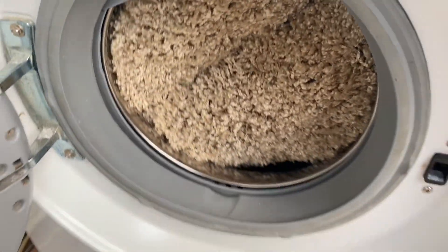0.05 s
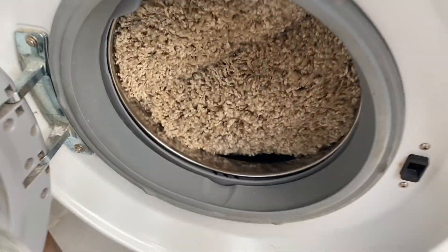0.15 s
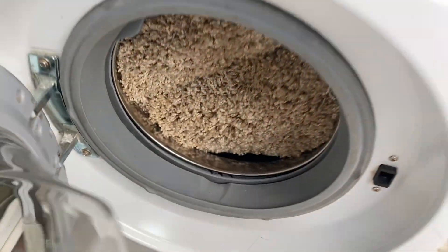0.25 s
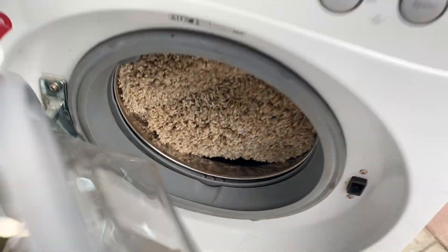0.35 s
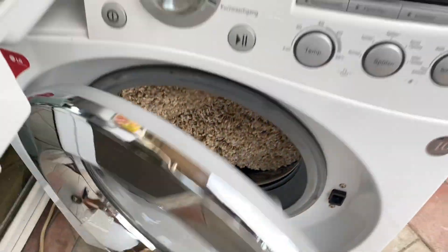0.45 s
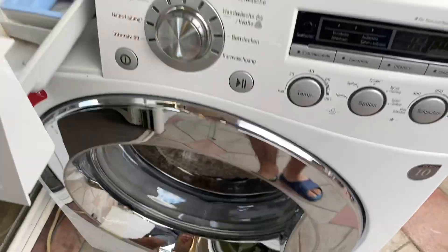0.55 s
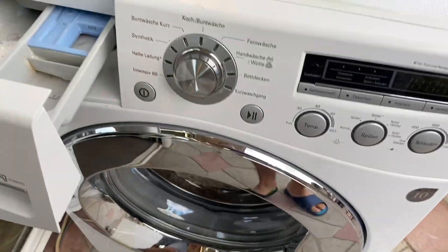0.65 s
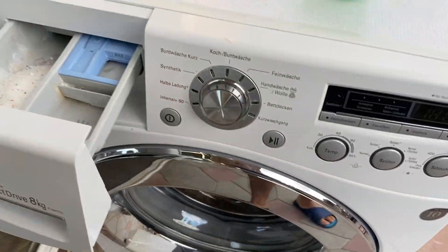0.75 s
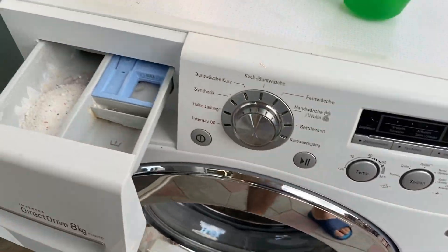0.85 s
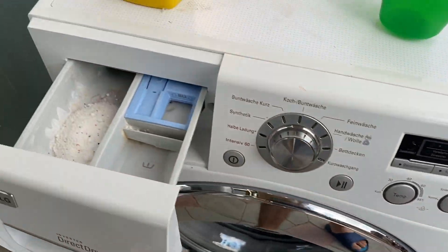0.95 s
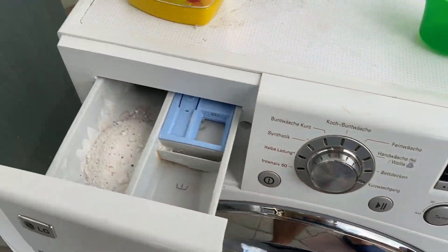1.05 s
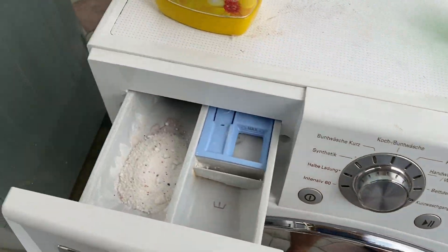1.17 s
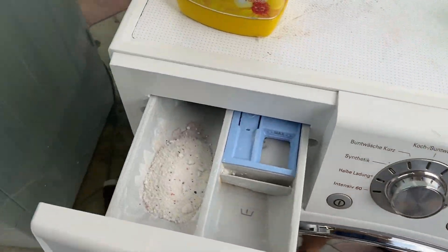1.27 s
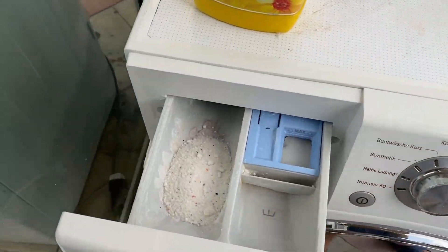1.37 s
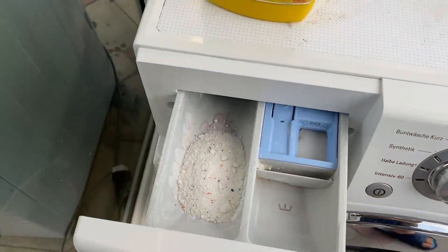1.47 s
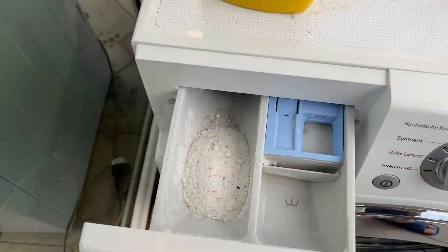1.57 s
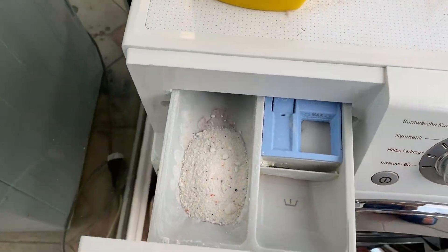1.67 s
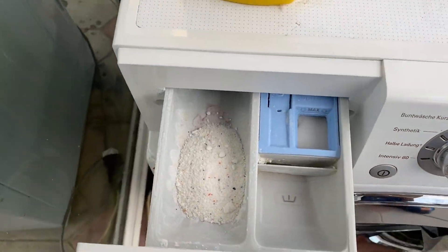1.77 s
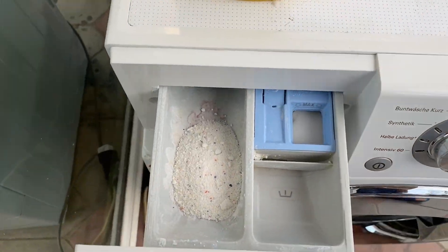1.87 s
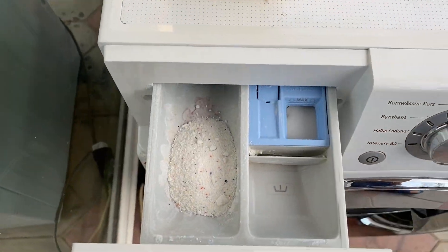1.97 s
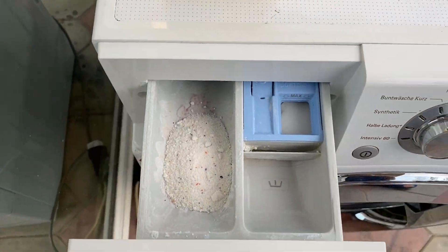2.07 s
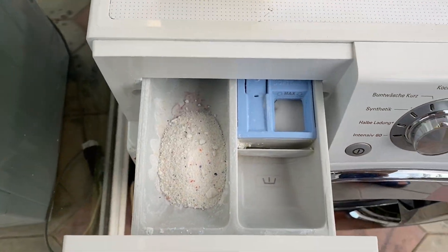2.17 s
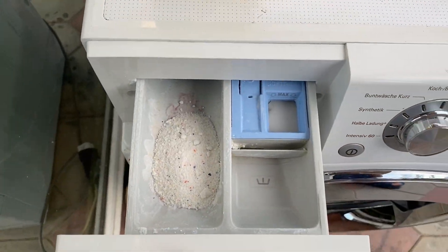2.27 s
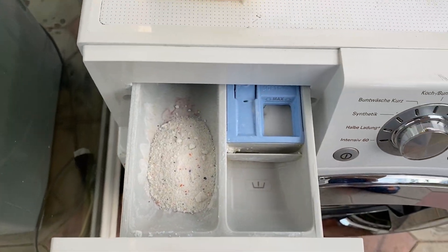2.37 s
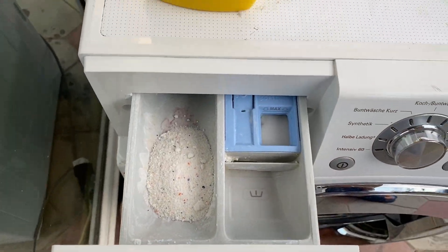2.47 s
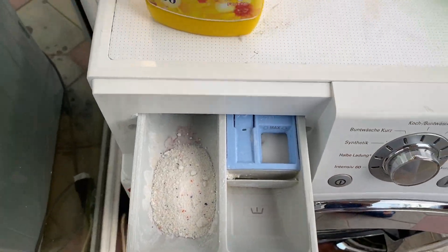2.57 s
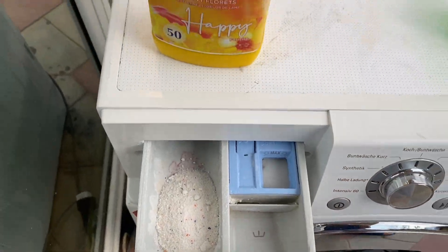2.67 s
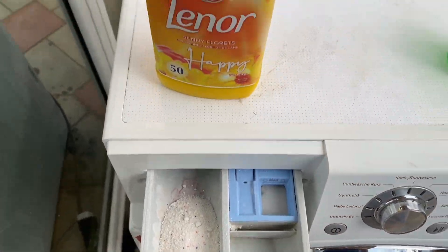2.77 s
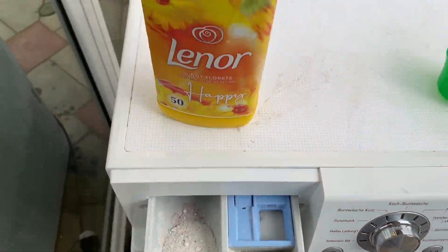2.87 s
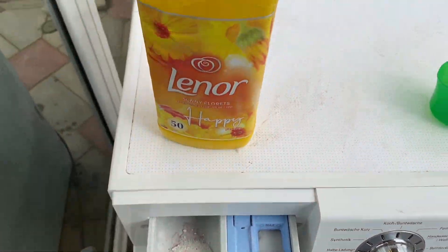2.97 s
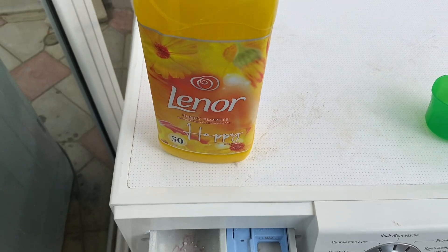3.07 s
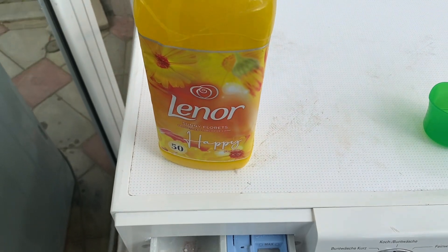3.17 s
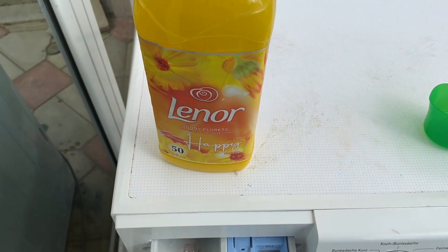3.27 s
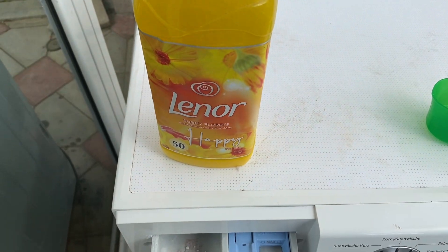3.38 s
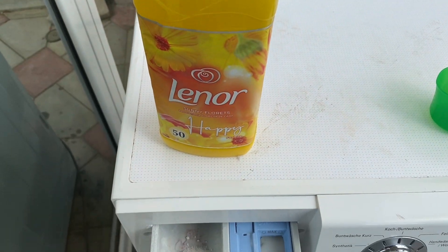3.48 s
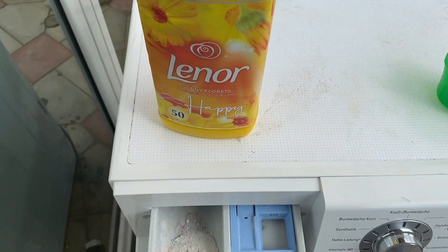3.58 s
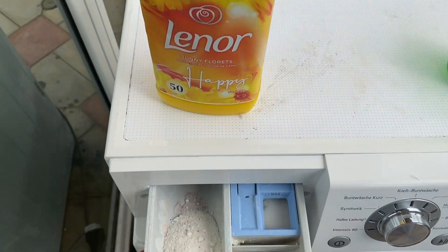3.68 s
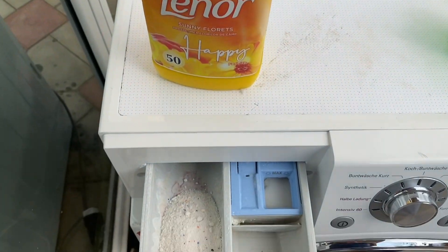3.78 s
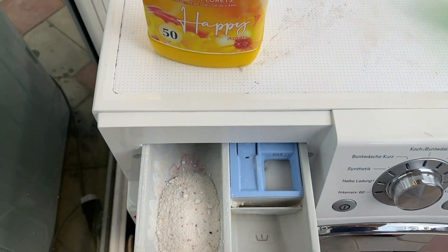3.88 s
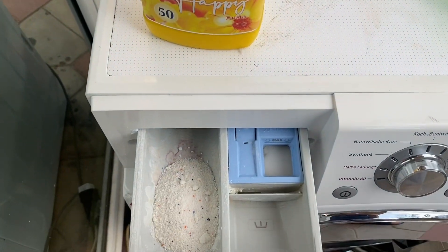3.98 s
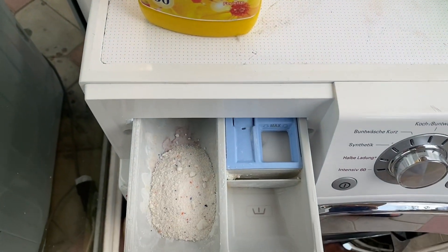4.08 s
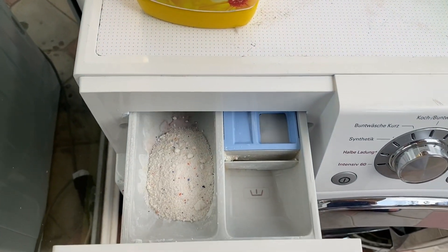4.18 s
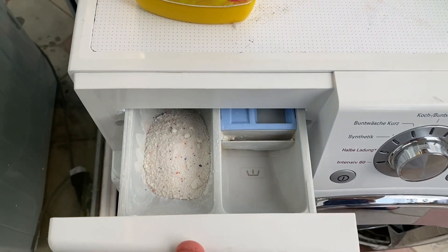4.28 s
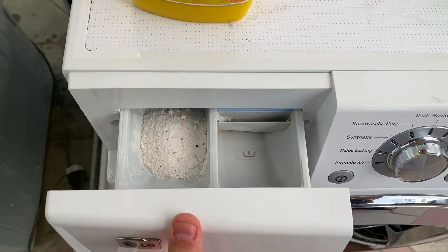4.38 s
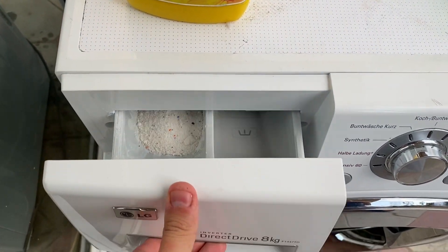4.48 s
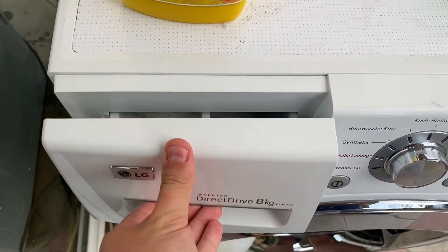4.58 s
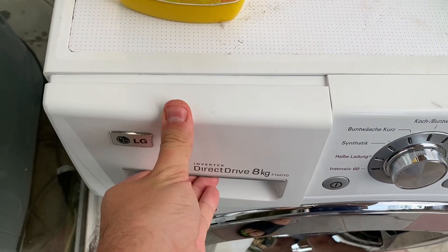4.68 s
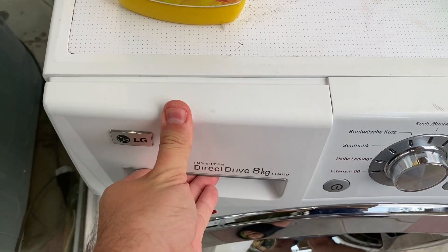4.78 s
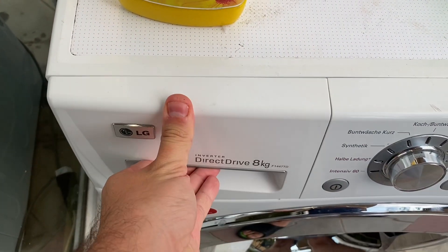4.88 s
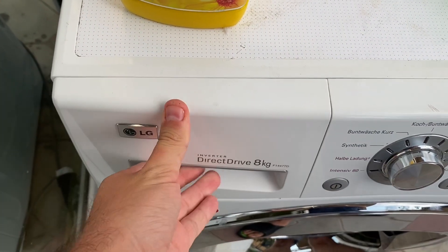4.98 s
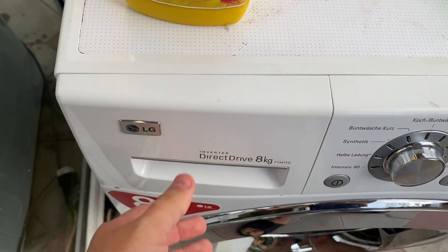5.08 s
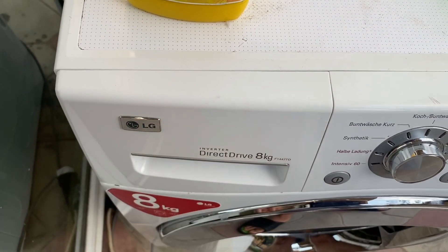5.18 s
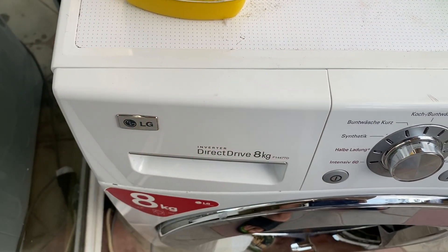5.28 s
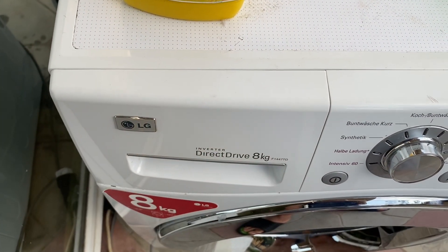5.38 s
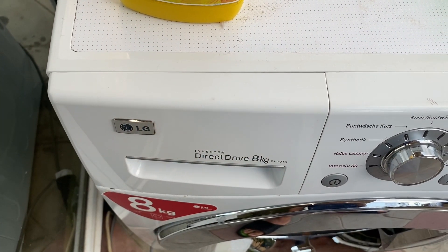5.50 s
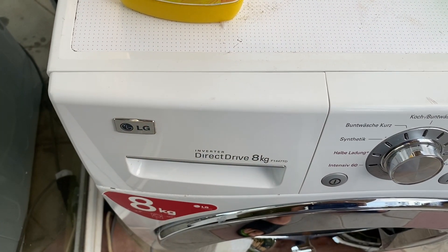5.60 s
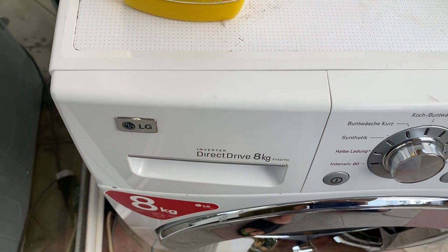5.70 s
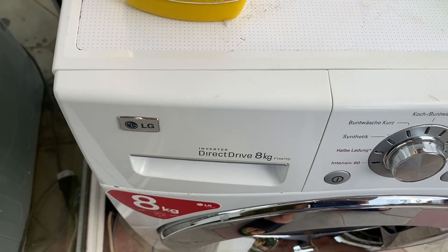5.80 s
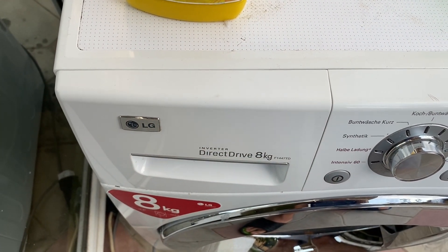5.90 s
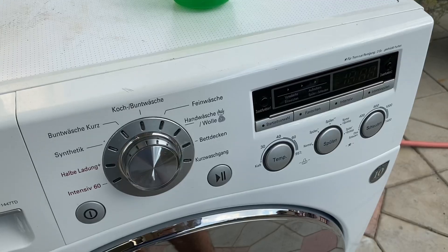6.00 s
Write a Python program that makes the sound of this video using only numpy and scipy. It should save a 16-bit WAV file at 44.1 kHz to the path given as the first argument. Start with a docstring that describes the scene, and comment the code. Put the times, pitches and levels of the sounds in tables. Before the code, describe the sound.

Over whining motor hum and air noise, soft thuds lead to a hard door slam; seconds later a plastic drawer slides, clicks and clacks closed.

```python
"""Soft thuds and a faint hiss of cloth come first, then a washing machine door slams and shudders in its seal.
Later the detergent drawer slides home with a hiss, knocks over two catches, snaps shut and ticks once more.
Short taps ring decaying modes of plastic and glass, soft pushes boom the cabinet, and noise makes the cracks.
All along, a motor whines in many thin sine lines over its air noise, a low rumble of filtered noise wavers,
and feet scuff the tiles now and then as bursts of gritty noise."""
import sys
import numpy as np
from scipy import signal
from scipy.fft import rfft, irfft
from scipy.io import wavfile

SR = 44100
rng = np.random.default_rng(int(sys.argv[2]) if len(sys.argv) > 2 else 0)


def dump(signal):
    """Clip the signal to [-1, 1] and save it as 16-bit WAV at the path in sys.argv[1]."""
    limited = np.clip(np.atleast_2d(signal).T, -1, 1)
    pcm = np.round(limited * 32767).astype(np.int16)
    wavfile.write(sys.argv[1], SR, pcm)


N = 266628
HZ = np.maximum(np.fft.rfftfreq(N, 1 / SR), 1)

# Touches of the door, drawer and catches, and soft deep thuds before the slam. Each row: start in seconds,
# crack level in dB, ring level in dB, thump level in dB, tap length in seconds (a few samples are added).
# The levels drive the sounds of the parts; they are not final loudness.
DOOR = [(0.5374, -8.5, -19, -30, 0.00017), (0.5407, -11, -30, -36, 0.00019), (.545, -15, -11, -47, 0.00037),
        (.5472, -19, -14.5, -40, 0.00018), (.551, -33, -30, -10.5, 0.00095), (.5535, -24, -8.5, -36, 0.001),
        (0.5573, -14, -15, -36, 0.00056), (0.5602, -26, -16, -36, 0.00049),
        (0.563, -31, -25, -13.5, 0.00086), (0.5684, -26, -23, -9.5, 0.0018),
        (0.5757, -24, -19.5, -5, 0.0002), (0.5808, -32, -23, -7, 0.0003), (0.5938, -30, -23, -21.5, 0.0012),
        (0.607, -26, -21, -42, 0.0012), (0.625, -34, -37, -42, 0.00045), (.628, -36, -24.5, -20, 0.0004),
        (.6312, -37, -40, -40, 0.00026), (.6325, -32, -29, -20, 0.00033)]
THUDS = [(.055, -80, -80, -22, 0.012), (.132, -80, -80, -22, 0.012), (.25, -80, -80, -26.5, 0.0122)]
# The drawer's snap, its rebounds and a late tick, with the same columns.
DRAWER = [(4.8335, -15, -10.5, -12.5, 0.00042), (4.8368, -12.5, -18, -41, 0.00023),
          (4.8385, -41, -13.5, -33, 0.00036), (4.8415, -56, -8.5, -15.5, 0.0014),
          (4.8448, -52, -15, -31, 0.00064), (4.8515, -57, -24, -31, 0.00066),
          (4.862, -61, -15, -10.5, 0.0024), (4.868, -63, -25, -25, 0.00095), (4.925, -60, -27, -29, 0.0031),
          (4.945, -62, -36, -15.5, 0.0047), (4.975, -62, -38, -12.5, 0.0055),
          (4.993, -56, -36, -30, 0.00097), (5.05, -75, -30, -25, 0.0028), (5.952, -73, -44, -63, 0.00095)]
# The runner knocking over two catches, each with small bounces, with the same columns.
CATCHES = [(4.549, -64, -23, -63, 0.00025), (4.5525, -57, -28, -41, 0.0009),
           (4.556, -60, -25, -35.5, 0.0023), (4.577, -52, -26, -45, 0.002),
           (4.662, -48, -18.5, -39, 0.0007), (4.6665, -46, -18.5, -31, 0.0008),
           (4.682, -47, -24, -38, 0.0014), (4.699, -58, -22, -39, 0.0025), (4.714, -60, -36, -34, 0.0017)]
# Ways the plastic, glass and cabinet ring. Each row: pitch in Hz, relative level in dB,
# time to die away by 60 dB in seconds.
DOOR_MODES = [(203, -6, 0.056), (312, -11, 0.089), (440, -3.5, 0.02), (549, -4, 0.054), (620, -3.5, 0.053),
              (760, -5.5, 0.043), (831, -4.5, .05), (1000, -8, 0.038), (1070, -11, 0.035),
              (1225, -10, 0.019), (1590, -7, 0.025), (1890, -11, 0.034), (2150, -6.5, 0.04),
              (2780, -4, 0.032), (3190, -3, 0.05), (4650, -13, 0.025), (6620, -20, .02)]
DRAWER_MODES = [(166, -33, 0.03), (258, 1, 0.026), (355, -14, 0.092), (451, -7, 0.044),
                (636.5, -3.5, 0.066), (842, 1.5, 0.037), (1000, -16, 0.036), (1086, -8, 0.043),
                (1330, -11, 0.04), (1460, -5, 0.04), (2030, -10, 0.038), (2315, -4, .03),
                (3180, -24, 0.034)]
CATCH_MODES = [(172, -14, 0.019), (240, 1.5, 0.022), (300, -5.5, 0.052), (557, -6, 0.036),
               (790, -10, 0.019), (957, -2.5, 0.033), (1125, -5.5, 0.058), (1370, -7, 0.034)]
CABINET_MODES = [(65.4, -7.5, 0.22), (86.5, -6.5, 0.33), (102.4, -10, 0.3), (114.75, -2, 0.44),
                 (191.6, -22, .5), (258, -8, 0.17), (321, -15, 0.26)]
# Colours of the noises. Each row: frequency in Hz, relative level in dB per Hz.
DOOR_CRACK = [(180, -46), (300, -49), (555, -11.5), (1190, -5), (1580, -6), (3760, -16), (4750, -17),
              (8360, -26.5), (10700, -24.5), (14700, -40), (16000, -54)]
DRAWER_CRACK = [(900, -4), (1600, -11), (2300, 0), (3000, -7), (6000, -9.5), (8500, -19.5), (10600, -10.5),
                (12200, -33), (14000, -22), (16000, -34)]
MOTOR_AIR = [(200, -4), (290, -18), (430, -19), (700, -20), (950, -2.5), (1100, -8), (1500, -1.5),
             (2150, -20), (2500, -7), (3400, -2.5), (4500, -23.5), (6900, -16.5), (8500, -33.5),
             (10000, -23), (12000, -46.5), (14000, -44)]
RUMBLE_TONE = [(12, -45), (20, 0), (32, -12), (54, 6.5), (82, 4), (150, -6.5), (260, -16.5), (340, -22),
               (570, -120)]
SCUFF_TONE = [(2000, 6.5), (4000, 0.5), (6550, -2.5), (8500, -16), (9300, 2), (11300, -5.5), (12100, -55),
              (13000, -3), (14700, -17), (16000, -30)]
EVEN = [(20, 0), (20000, 0)]
# How alike left and right are, for sounds in general and for blows close by.
# Each row: frequency in Hz, likeness from 0 (unrelated) to 1 (the same).
LIKENESS = [(30, 0.94), (125, 0.98), (300, 0.85), (600, 0.09), (1200, 0.0097), (3000, 0.0096), (6000, 0.19),
            (8500, 0.24), (14000, 0.18)]
NEAR_LIKENESS = [(30, .99), (250, 0.97), (600, 0.88), (1400, 0.4), (3000, 0.46), (6000, 0.55),
                 (8500, 0.082), (14000, 0.082)]
# Steady motor lines. Each row: pitch in Hz, level in dB before the motor's loudness is added.
WHINE = [(272, -66), (293, -62), (439, -73), (587, -65), (751, -69), (770, -65), (789, -65), (880, -63),
         (896, -70), (926, -60), (964, -63), (980, -68), (1026, -70), (1157, -67), (1174, -70), (1206, -69),
         (1252, -67), (1300, -68), (1418, -67), (1521, -67), (1540, -65), (1559, -60), (1620, -63),
         (1715, -64), (1752, -66), (1906, -66), (1927, -64), (2038, -65), (2067, -63), (2102, -62),
         (2118, -59), (2180, -64), (2199, -62), (2293, -66), (2315, -63), (2406, -69), (2549, -70),
         (2697, -66), (2751, -65), (2807, -66), (2982, -67), (3082, -69), (3273, -62), (3367, -66),
         (3534, -65), (3889, -69), (4218, -77)]
# Motor loudness as the listener moves. Each row: time in seconds, air noise level in dB,
# level of the strongest line in dB before its trims.
MOTOR = [(0, -44, -68), (.3, -42, -68), (.8, -38.5, -45), (1.25, -42, -56), (1.6, -42.5, -42),
         (2.3, -42, -46.5), (2.7, -41, -46.5), (3.06, -40.5, -55.5), (3.8, -41.5, -42), (4.2, -41.5, -60),
         (4.75, -41, -41), (5.3, -42, -45), (5.56, -42, -59), (6.05, -42, -63)]
# Pitches in Hz of ten more lines that swell and sink as the listener moves.
SWELLING_HZ = [694.5, 1348.5, 1389.5, 1733.5, 1852.5, 2780, 2887, 3013, 3182, 3243.5]
# Their levels. Each row: time in seconds, then the level of each line in dB before the trim, in pitch order.
SWELLING = [(0.25, -62, -54, -57, -57, -60, -53, -68, -61, -73, -54),
            (1.0, -60, -53, -52, -65, -54, -53, -61, -55, -65, -56),
            (1.4, -56, -54, -55, -53, -56, -56, -62, -58, -68, -56),
            (1.9, -56, -59, -59, -57, -51, -50, -68, -61, -64, -56),
            (2.4, -56, -55, -59, -53, -51, -53, -66, -57, -65, -54),
            (2.9, -55, -63, -53, -53, -51, -56, -58, -56, -60, -59),
            (3.3, -55, -59, -52, -57, -52, -56, -54, -58, -63, -53),
            (3.75, -55, -64, -56, -60, -51, -55, -52, -57, -56, -57),
            (4.25, -56, -59, -59, -65, -51, -53, -65, -59, -60, -56),
            (5.2, -55, -57, -56, -52, -52, -56, -65, -64, -59, -56),
            (5.7, -54, -55, -60, -56, -52, -54, -64, -60, -57, -50),
            (5.99, -59, -59, -50, -66, -55, -50, -60, -56, -75, -57)]
# Balance of the motor between the ears. Each row: frequency in Hz, left minus right in dB.
MOTOR_BALANCE = [(200, 4), (500, -9), (950, -1.5), (1900, -0.5), (3800, 0), (6000, 3.5), (9000, -1),
                 (15000, 1)]
# Resonances of the motor casing. Each row: pitch in Hz, width in Hz, level in dB before a common lift.
CASING = [(267.5, 67, -7), (454, 28, -12.5), (579, 16, -5), (661, 11, -5.5), (997, 81, -6), (1326, 50, -10),
          (1666, 54, -1.5), (2134, 55, 2.5), (2284, 14.5, 0), (2747, 37, 1), (3216, 26, 0),
          (3522, 51, -0.5), (3960, 49, -7.5), (4365, 99, -14.5), (6800, 13, -10)]
# The motor's colour shifts as the listener turns. Each row: middle in seconds, length in seconds,
# low edge in Hz, high edge in Hz, greatest lift in dB.
COLOUR_SHIFTS = [(.15, 3, 1000, 3600, -3), (1.11, 1.7, 1200, 1290, 6.5), (2.76, 2.6, 3040, 3150, -8),
                 (3.29, 1.6, 3400, 3800, 2.5), (2.76, 3.8, 1040, 1160, -11), (3.26, 7.2, 2500, 2720, -10)]
# Low rumble. Each row: time in seconds, level in dB before it wavers.
RUMBLE = [(0, -41), (.3, -47.5), (.5, -50), (1.3, -50), (2, -52.5), (2.25, -50.5), (3.2, -50), (4, -51),
          (4.7, -50.5), (5.4, -54.5), (6.05, -53)]
# The drum sways on its springs after each slam. Each row: start in seconds, level in dB before rise and decay.
SWAYS = [(.6, -33), (4.84, -36.5)]
# Scuffs on the tiles. Each row: start in seconds, length in seconds, level in dB before shaping.
SCUFFS = [(0.815, 0.055, -43.5), (0.845, 0.073, -42.5), (1.085, 0.0041, -47), (1.248, 0.003, -45),
          (1.427, 0.061, -46.5), (4.954, 0.032, -58), (5.092, 0.0092, -52), (5.962, 0.0035, -58)]
# Faint hiss of cloth, then of the sliding drawer, with the same columns.
SLIDE = [(0, 0.4, -62.5), (4.05, 0.85, -57.5)]

# After the slam the door touches its seal softly, each touch weaker than the last on average.
SHUDDER_FROM_S, SHUDDER_GAP_S, SHUDDER_LOSS_DB, SHUDDER_TAP_S = .648, .0175, 1.1, 0.0031
SHUDDER_CRACK_DB, SHUDDER_RING_DB, SHUDDER_THUMP_DB = -56, -14.5, -23.5   # of the first touch, before chance
AFTER_RATTLE_DB, AFTER_RATTLE_S = -22, 0.019   # loose parts buzz on faintly after each crack
BASS_CUT_HZ = 86   # the ringing of the parts is cut below this, so it carries no deep bass
STRONGEST_HZ, STRONGEST_TRIM_DB, LINE_TRIM_DB = 2137, -5.0, -1.0
FLUTTER_DB, FLUTTER_RATE_HZ, WOBBLE_RAD = 4.5, 7.6, 0.36   # the strongest line breaks up in quick bursts
WAVER_DB, WAVER_RATE_HZ = 3.5, 4   # every line breaks up a little
WHINE_OVER_AIR_DB, CASING_LIFT_DB = 43, 4.0
SWAY_RISE_S, SWAY_T60_S = 0.045, 1.17
SCUFF_RISE_SHARE = .2   # a scuff bites quickly, then trails off
SLIDE_RISE_S, HISS_FLOOR_DB = 0.093, -70
ROOM_T60_S, ROOM_DB, WALL_CUT_HZ = 0.55, -24, 2400
TREBLE_LAG_S, TREBLE_FROM_HZ = .00027, 8300   # the treble of each noise is late in the left ear
CUTOFF_HZ = 16500


def blows(contacts, modes, crack_tone, rattle_db, rattle_s, pan_db, push_s, push_from_hz):
    """A tap and short rattle crack and ring the part, and a soft push booms the cabinet."""
    crack, strike, push = np.zeros((2, N)), np.zeros((2, N)), np.zeros(N)
    bright = stereo_noise(crack_tone, likeness=NEAR_LIKENESS)
    rough = stereo_noise(EVEN, likeness=NEAR_LIKENESS)
    t = np.arange(SR // 12) / SR
    fade = np.exp(-t / rattle_s) * np.minimum(t / 0.00015, 1)
    crack_fade = fade + from_db(AFTER_RATTLE_DB) * np.exp(-t / AFTER_RATTLE_S)
    for s, crack_db, ring_db, thump_db, tap_s in contacts:
        i = round(s * SR)
        span = slice(i, i + len(t))
        tap = signal.windows.hann(int(tap_s * SR) + 3)
        tap = tap / tap.sum()   # a longer tap is softer and wakes only low modes
        rattle = signal.lfilter(tap, [1], from_db(rattle_db) * fade * rough[:, span])
        crack[:, span] += from_db(crack_db) * crack_fade * bright[:, span]
        strike[:, span] += from_db(ring_db) * rattle
        strike[:, i:i + len(tap)] += from_db(ring_db) * tap
        soft = signal.windows.hann(int((push_s + tap_s) * SR))
        push[i:i + len(soft)] += from_db(thump_db) * soft / soft.sum()
    # a light part moves the deepest panels less
    push = signal.sosfilt(signal.butter(4, push_from_hz, "high", fs=SR, output="sos"), push)
    bass_cut = signal.butter(2, BASS_CUT_HZ, "high", fs=SR, output="sos")
    part = signal.sosfilt(bass_cut, ring(strike, modes))
    return (crack + part) * from_db([[pan_db / 2], [-pan_db / 2]]) + ring(push, CABINET_MODES)


def shudder(count):
    """Makes rows for the door's dying touches, uneven in time and strength by chance."""
    rows = []
    for k, (when, ring_luck, thump_luck) in enumerate(rng.standard_normal((count, 3))):
        start = SHUDDER_FROM_S + SHUDDER_GAP_S * (k + 0.2 * when)
        ring_db = SHUDDER_RING_DB - SHUDDER_LOSS_DB * k + 1.7 * ring_luck
        thump_db = SHUDDER_THUMP_DB - SHUDDER_LOSS_DB * k + 2.0 * thump_luck
        rows.append((start, SHUDDER_CRACK_DB, ring_db, thump_db, SHUDDER_TAP_S))
    return rows


def ring(x, modes):
    """Each mode is a resonator that x sets ringing; their signs alternate."""
    out = 0
    for k, (hz, db, t60) in enumerate(modes):
        r = from_db(-60 / (t60 * SR))   # loss per sample
        w = 2 * np.pi * hz / SR
        strength = from_db(db) * np.sin(w)
        out = out + (-1) ** k * signal.lfilter([0, strength], [1, -2 * r * np.cos(w), r * r], x + 1e-18)
    return out


def door():
    """Soft thuds, the slam and the shudder ring the door and boom the cabinet."""
    return blows(THUDS + DOOR + shudder(count=11), DOOR_MODES, DOOR_CRACK, rattle_db=-22.5,
                 rattle_s=0.0044, pan_db=1.6, push_s=0.0032, push_from_hz=21)


def drawer():
    """The catches and then the snap ring the light plastic and push the cabinet."""
    snap = blows(DRAWER, DRAWER_MODES, DRAWER_CRACK, rattle_db=-23.5,
                 rattle_s=0.004, pan_db=2.0, push_s=0.0031, push_from_hz=127)
    knocks = blows(CATCHES, CATCH_MODES, DRAWER_CRACK, rattle_db=-24.5,
                   rattle_s=0.0041, pan_db=2.5, push_s=0.0015, push_from_hz=80)
    return snap + knocks


def motor():
    """Sine lines waver one by one, each with its own phase at the ears, over coloured air noise."""
    air_db, strongest_db = in_time(MOTOR)
    t, whine = np.arange(N) / SR, np.zeros((2, N))
    lines = [(hz, db + air_db + WHINE_OVER_AIR_DB) for hz, db in WHINE]
    lines += list(zip(SWELLING_HZ, in_time(SWELLING)))
    flutter_db = FLUTTER_DB * drift(FLUTTER_RATE_HZ)
    lines.append((STRONGEST_HZ, strongest_db + STRONGEST_TRIM_DB + flutter_db))
    for hz, db in lines:
        if hz == STRONGEST_HZ:
            wobble = WOBBLE_RAD * drift(FLUTTER_RATE_HZ)
        else:
            wobble = .5 * drift(1.67)
        phase = 2 * np.pi * (hz * t + rng.random()) + wobble
        level = from_db(db + WAVER_DB * drift(WAVER_RATE_HZ) + LINE_TRIM_DB)
        apart = rng.normal(0, min(1.1, hz / 600))   # phase between the ears, in radians
        ears = from_db(at_hz(MOTOR_BALANCE, hz) * np.array([[.5], [-.5]]))
        whine += level * ears * np.sin(phase + apart * np.array([[.5], [-.5]])) * np.sqrt(2)
    detail = sidebands(count=190, width_hz=7.8, spread_db=4.0, valley_db=-4.0, top_hz=4292)
    air = from_db(air_db) * stereo_noise(MOTOR_AIR, detail, MOTOR_BALANCE)
    return turn(air + whine)


def sidebands(count, width_hz, spread_db, valley_db, top_hz):
    """Shaft and bearing faults scatter faint narrow lines; the casing resonances lift those near them."""
    power = np.full(len(HZ), from_db(2 * valley_db))   # twice the dB turns gain into power
    for hz, db in zip(rng.uniform(249.4, top_hz, count), rng.normal(0, spread_db, count)):
        near = slice(*np.searchsorted(HZ, [hz - 10 * width_hz, hz + 10 * width_hz]))
        power[near] += from_db(2 * db) / (1 + (2 * (HZ[near] - hz) / width_hz) ** 2) ** 2
    smooth = np.clip((HZ - top_hz) / 900 + 1, 0, 1)   # the lines melt into plain hiss towards the top
    lift = 1
    for hz, width, db in CASING:
        peak_db = db + CASING_LIFT_DB - at_hz(MOTOR_AIR, hz)
        lift = lift + from_db(2 * peak_db) / (1 + (2 * (HZ - hz) / width) ** 2)
    return np.sqrt((power * (1 - smooth) + 0.9 * smooth) * lift)


def turn(x):
    """As the listener turns, bands of the sound are gently lifted or shaded for a while."""
    t, out = np.arange(N) / SR, x.copy()
    for s, length, low_hz, high_hz, db in COLOUR_SHIFTS:
        share = np.cos(np.pi * np.clip((t - s) / length, -.5, .5)) ** 2
        band = signal.butter(1, [low_hz, high_hz], "band", fs=SR, output="sos")
        out += (from_db(db * share) - 1) * signal.sosfilt(band, x)
    return out


def rumble():
    """Low noise wavers by chance and swells when the drum sways."""
    level = from_db(in_time(RUMBLE)[0])
    for s, db in SWAYS:
        level = level + from_db(db) * swell(s, SWAY_RISE_S, SWAY_T60_S)
    return level * from_db(2.9 * drift(3.5)) * stereo_noise(RUMBLE_TONE)


def swell(s, rise_s, t60):
    """A level that rises softly from time s, then dies away."""
    t = np.maximum(np.arange(N) / SR - s, 0)
    return (1 - np.exp(-t / rise_s)) * from_db(-60 * t / t60)


def scuffs():
    """Rubbing makes gritty, uneven hiss: scuffs on the tiles, cloth and the sliding drawer."""
    gate = np.full(N, from_db(HISS_FLOOR_DB))
    for s, length, db in SCUFFS:
        along = np.linspace(0, 1, int(length * SR))
        shape = np.sqrt(np.minimum(along / SCUFF_RISE_SHARE, 1) * (1 - along))
        i = round(s * SR)
        gate[i:i + len(shape)] += from_db(db) * shape
    for s, length, db in SLIDE:
        t = np.arange(int(length * SR)) / SR
        shape = np.minimum(t / SLIDE_RISE_S, 1) * np.sqrt(1 - t / length)
        i = round(s * SR)
        gate[i:i + len(t)] += from_db(db) * shape
    grit = from_db(1.1 * drift(60.0) + 1.9 * drift(15.0))
    return gate * grit * stereo_noise(SCUFF_TONE)


def room(x):
    """Echoes blur into a dull, dying noise tail, separate in each ear."""
    t = np.arange(SR // 2) / SR
    tail = rng.standard_normal((2, len(t))) * from_db(-60 * t / ROOM_T60_S) * (t > .006)
    tail = signal.sosfilt(signal.butter(1, [200, WALL_CUT_HZ], "band", fs=SR, output="sos"), tail)
    return signal.fftconvolve(x, tail / np.sqrt(np.sum(tail ** 2) / 2), axes=1)[:, :N]


def stereo_noise(spectrum, detail=1, balance=EVEN, likeness=LIKENESS):
    """Noise of a given colour, mixed so that each frequency is more or less alike in both ears; rms 1."""
    mid, side = rfft(rng.standard_normal((2, N)))
    alike = np.clip(at_hz(likeness, HZ), -1, 1)
    edge = np.clip(HZ / spectrum[0][0], 0, 1) ** 4   # fades out below the first listed frequency
    colour = from_db(at_hz(spectrum, HZ)) * edge * detail
    ears = from_db(at_hz(balance, HZ) * np.array([[.5], [-.5]]))
    lag_s = TREBLE_LAG_S * (HZ > TREBLE_FROM_HZ) * np.array([[1], [0]])
    late = np.exp(-2j * np.pi * HZ * lag_s)
    both = np.sqrt(1 + alike) * mid + np.sqrt(1 - alike) * side * [[1], [-1]]
    return rms_one(irfft(colour * ears * late * both, N))


def drift(rate):
    """Slow chance: coarse noise smoothed twice with a corner at rate Hz; spread 1."""
    r = np.exp(-80 * np.pi * rate / SR)   # one coarse step is 40 samples
    noise = rng.standard_normal(N // 40 + 2002)
    slow = signal.lfilter([1], [1, -2 * r, r * r], noise)[2000:]   # drop the settling start
    return np.interp(np.arange(N) / 40, np.arange(len(slow)), rms_one(slow))


def in_time(rows):
    """Each column of a table, joined by straight lines sample by sample."""
    s, *columns = np.transpose(rows)
    return [np.interp(np.arange(N) / SR, s, c) for c in columns]


def at_hz(points, hz):
    """A table read at any frequency, on a log-frequency axis."""
    table_hz, values = np.transpose(points)
    return np.interp(np.log(hz), np.log(table_hz), values)


def from_db(db):
    """Decibels to gain."""
    return 10 ** (np.asarray(db) / 20)


def rms_one(x):
    """Scaled to rms 1."""
    return x / np.sqrt(np.mean(x ** 2) + 1e-20)


def scene():
    """Blows with their echoes over motor, rumble and scuffs."""
    hits = door() + drawer()
    return hits + from_db(ROOM_DB) * room(hits) + motor() + rumble() + scuffs()


def record(dry):
    """Peaks are rounded softly, then the very top of the treble is cut."""
    rounded = 1.05 * np.tanh(dry / 1.05)
    return signal.sosfilt(signal.cheby2(12, 70, CUTOFF_HZ, fs=SR, output="sos"), rounded)


dry = scene()
out = record(dry)
dump(out)
```